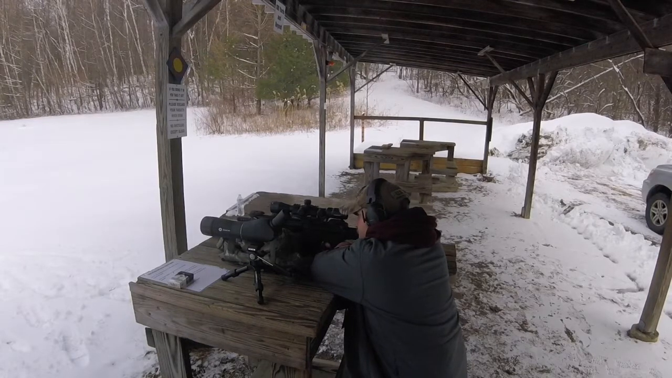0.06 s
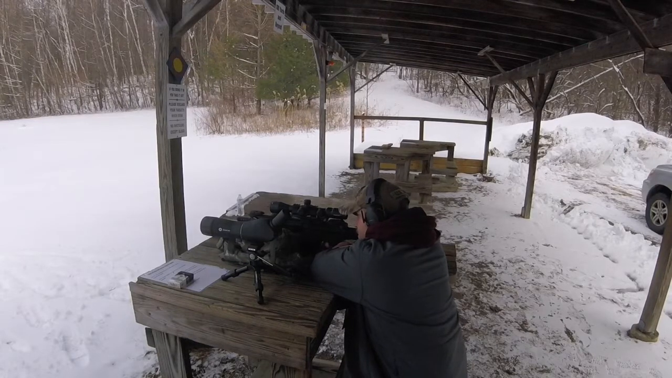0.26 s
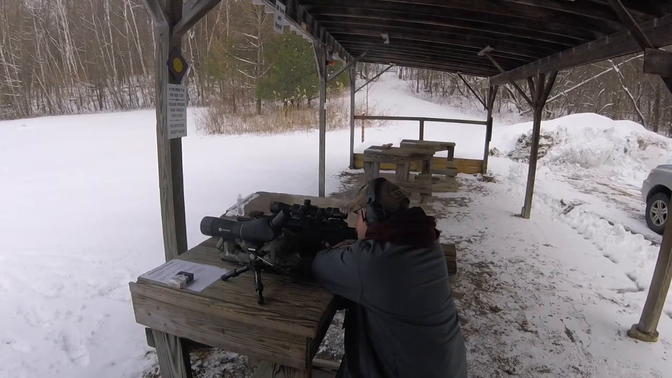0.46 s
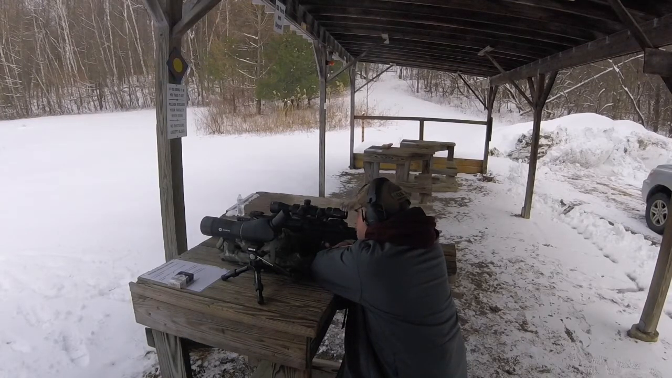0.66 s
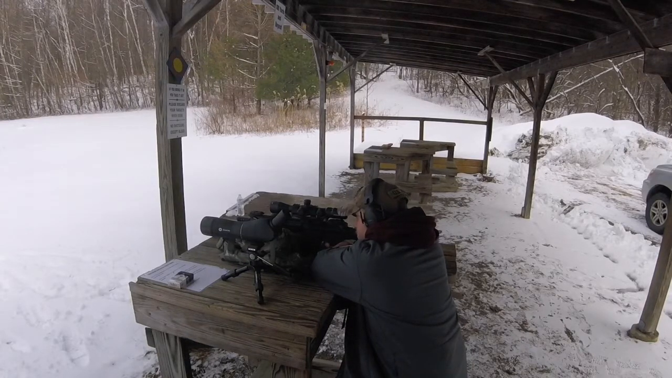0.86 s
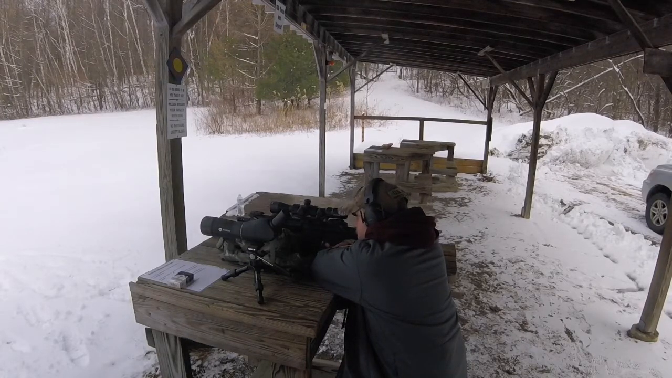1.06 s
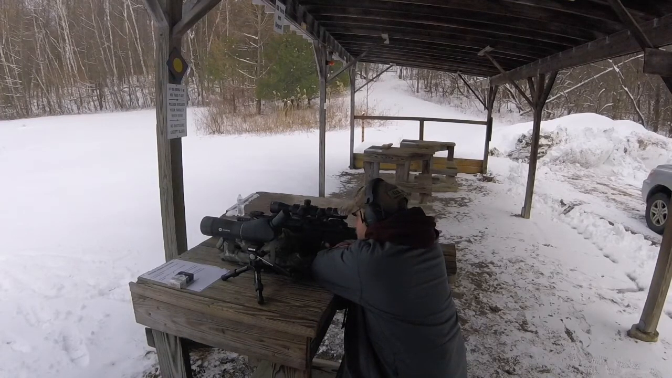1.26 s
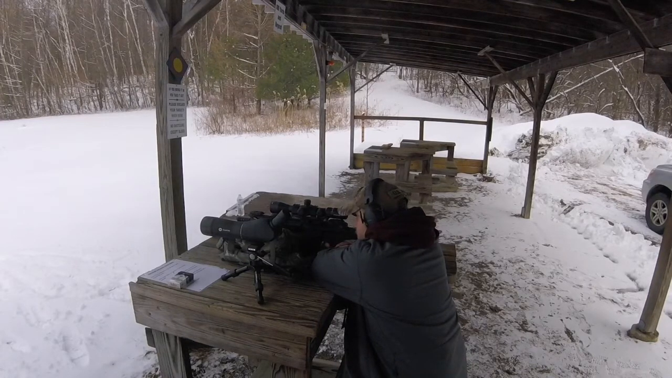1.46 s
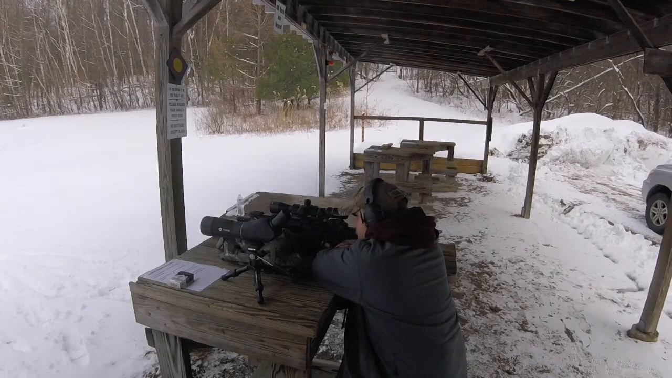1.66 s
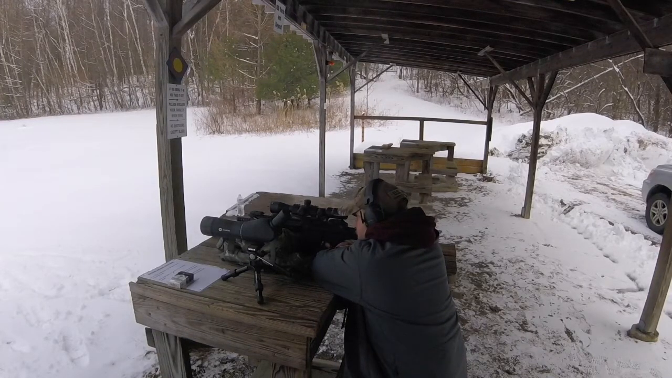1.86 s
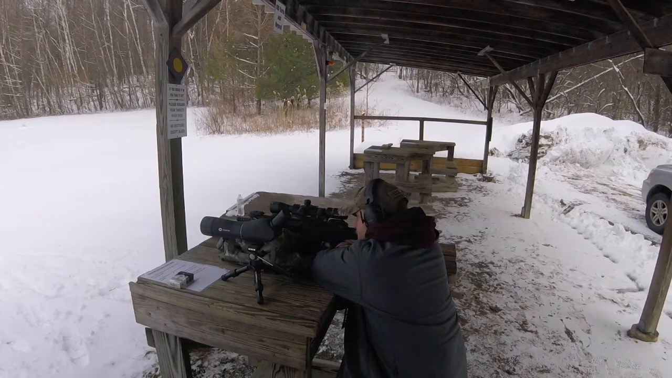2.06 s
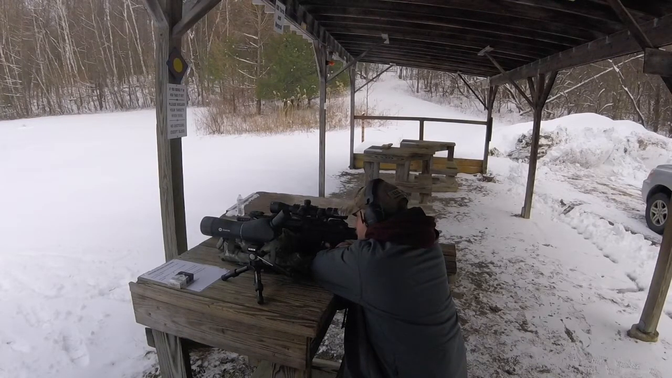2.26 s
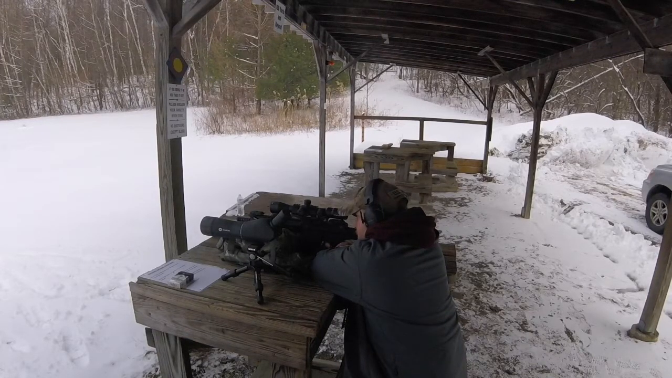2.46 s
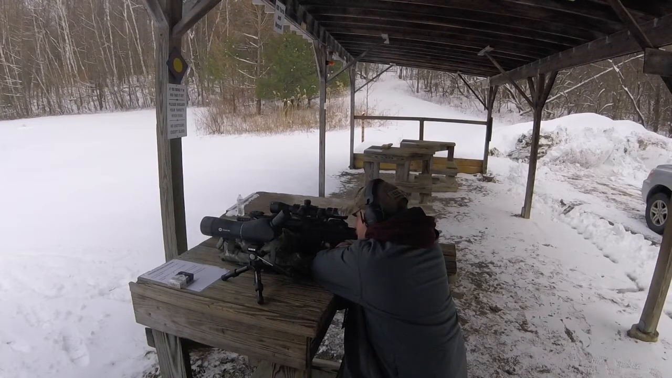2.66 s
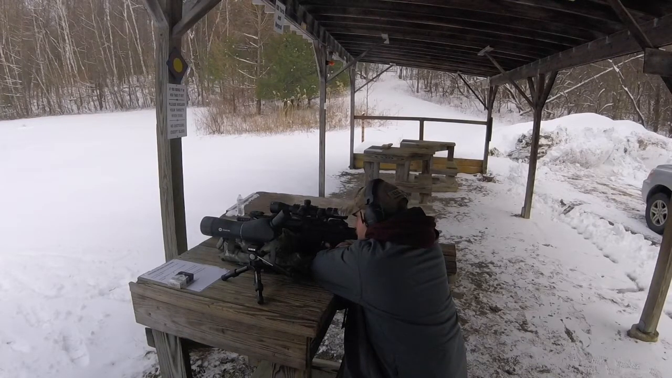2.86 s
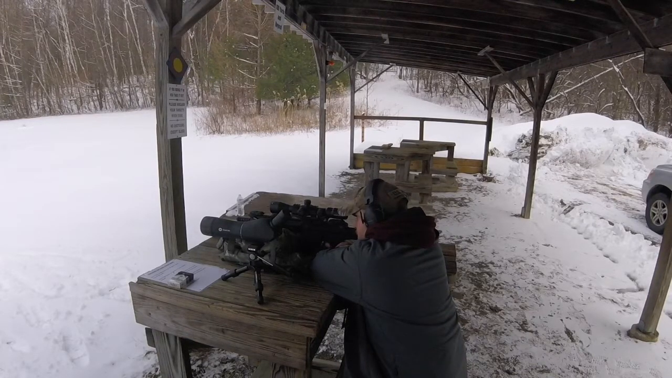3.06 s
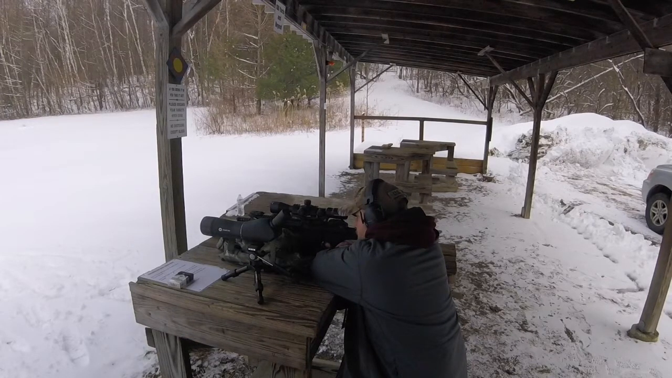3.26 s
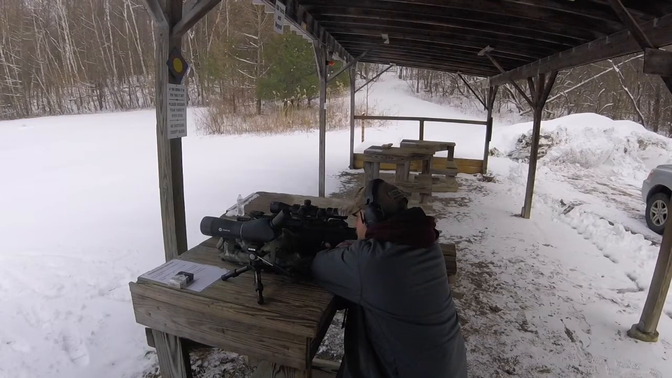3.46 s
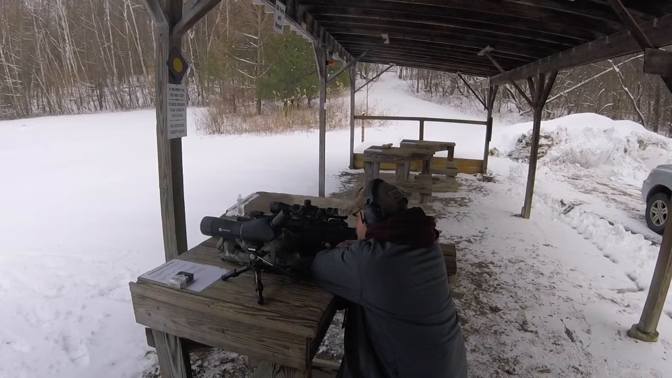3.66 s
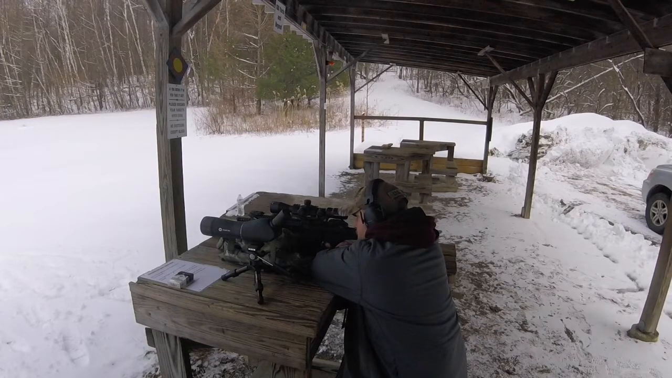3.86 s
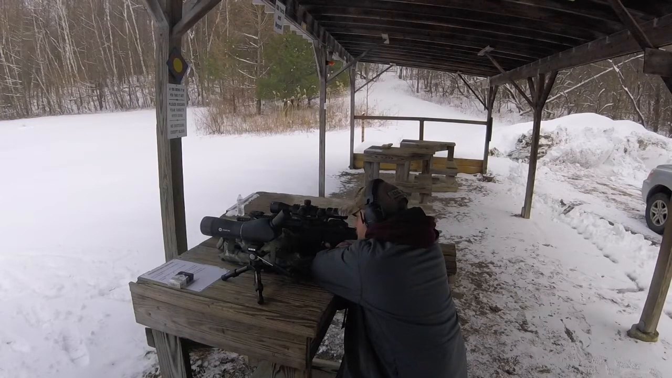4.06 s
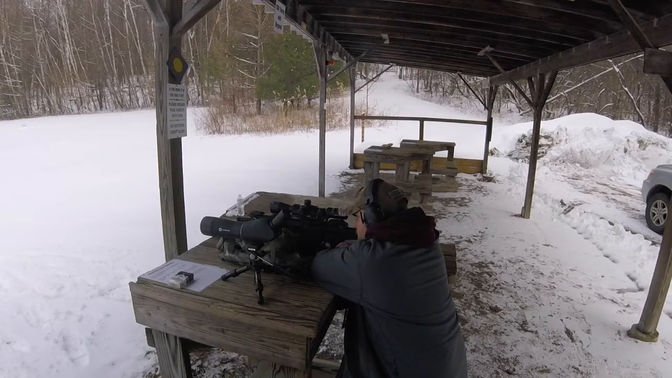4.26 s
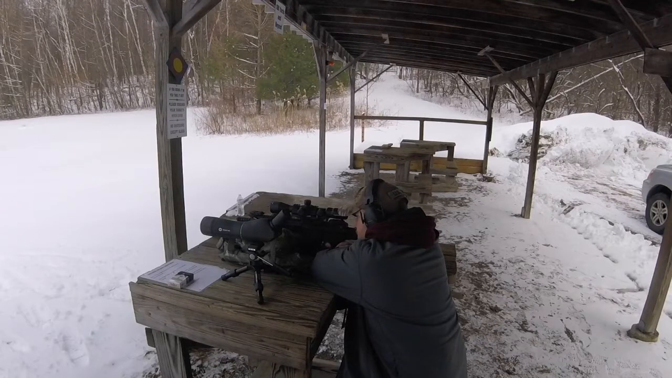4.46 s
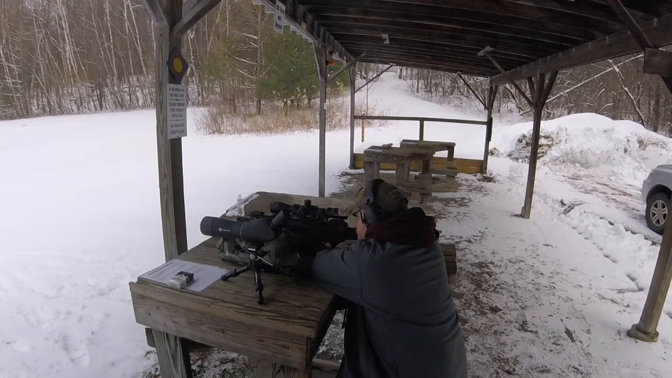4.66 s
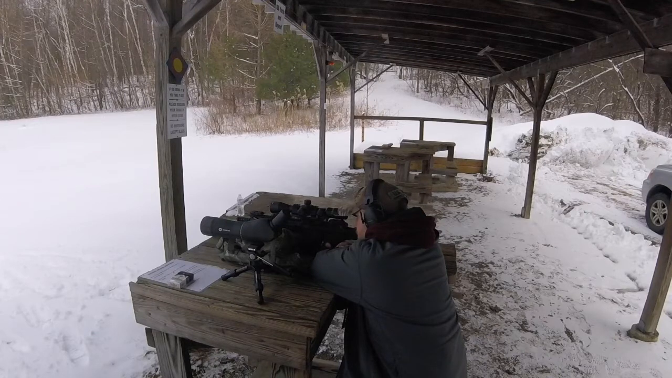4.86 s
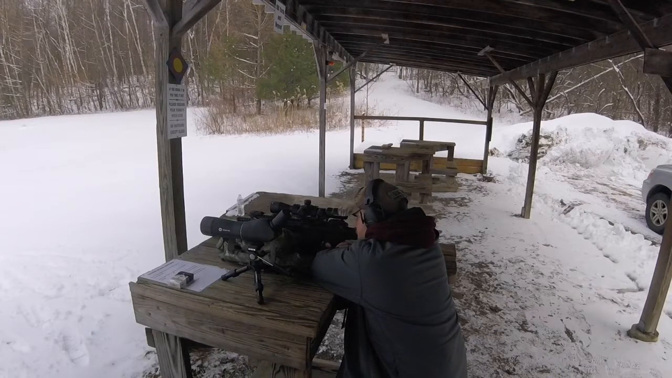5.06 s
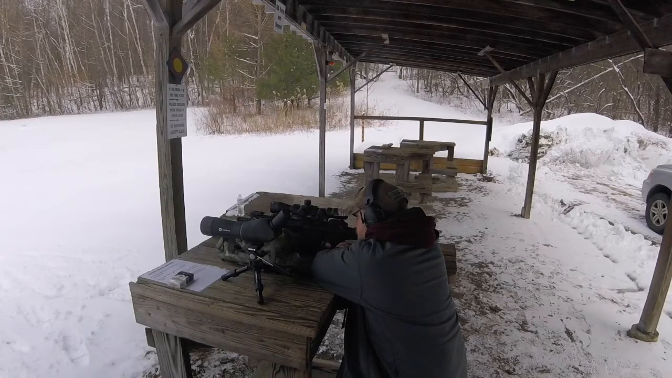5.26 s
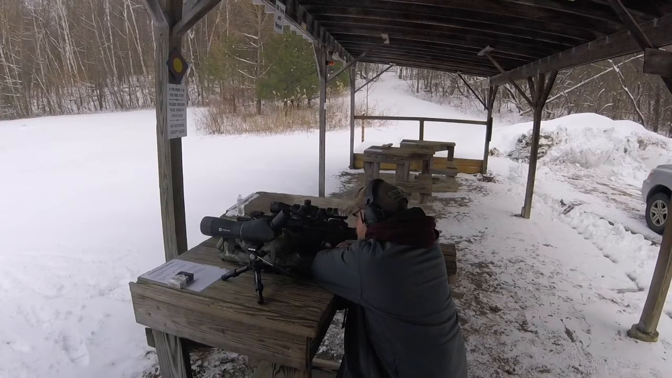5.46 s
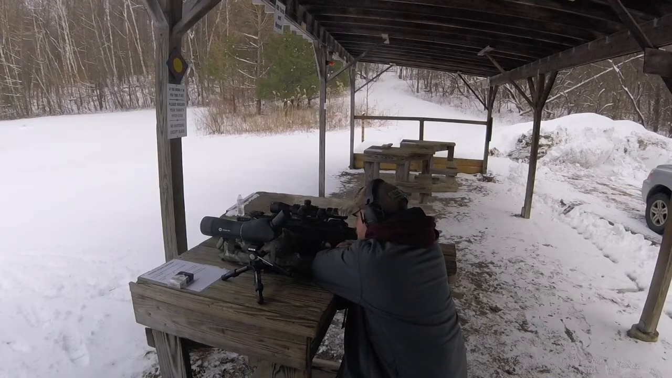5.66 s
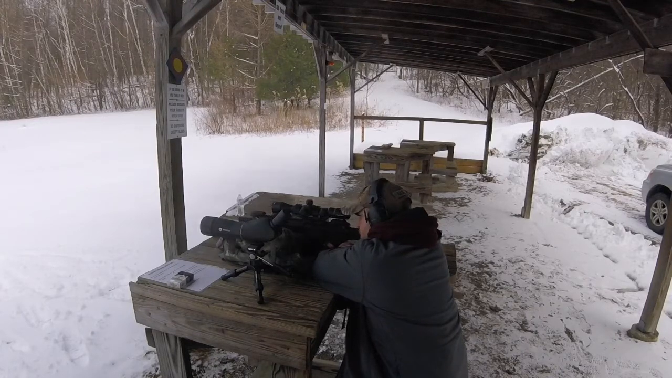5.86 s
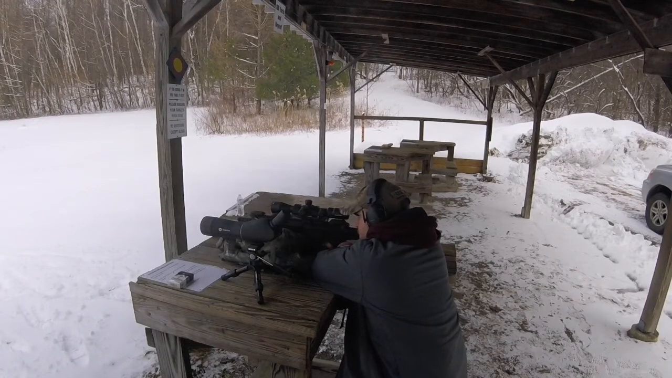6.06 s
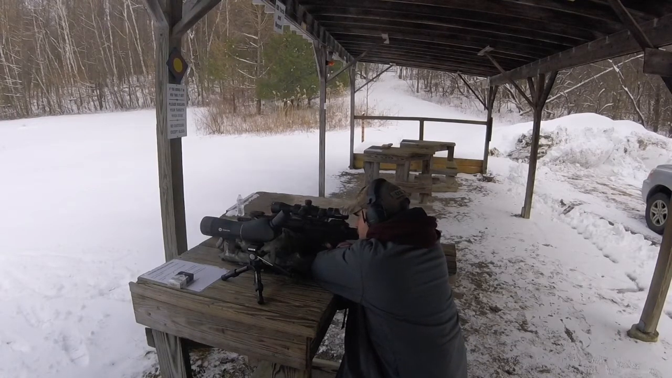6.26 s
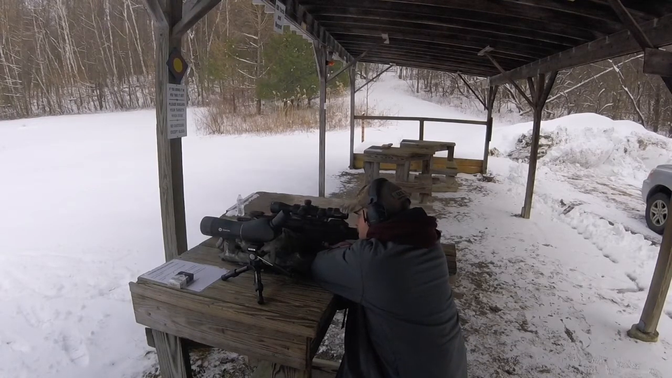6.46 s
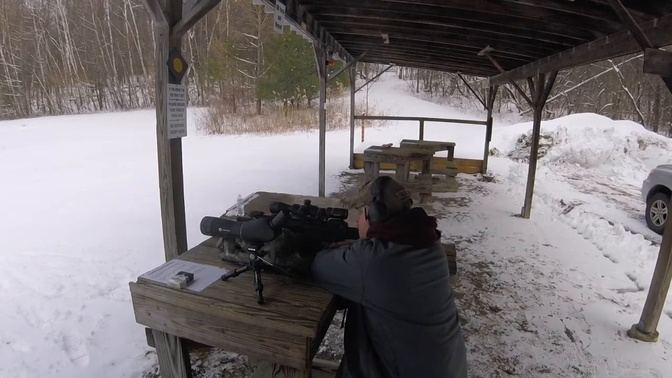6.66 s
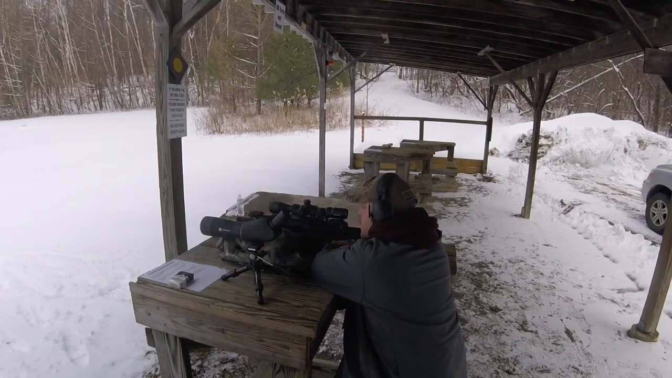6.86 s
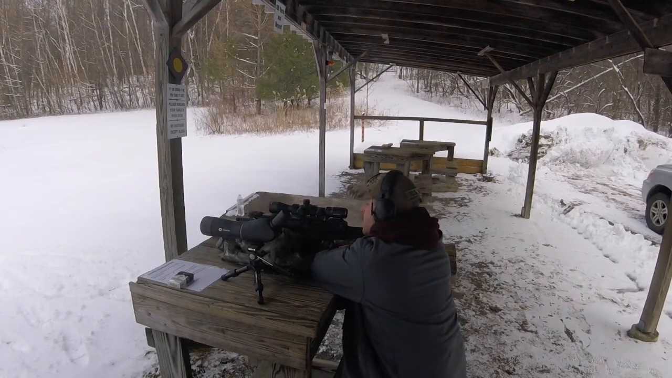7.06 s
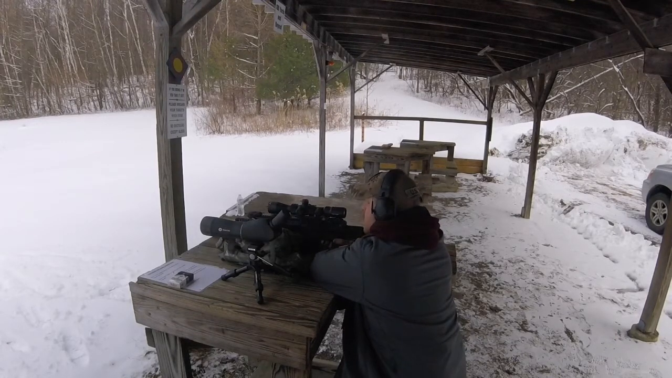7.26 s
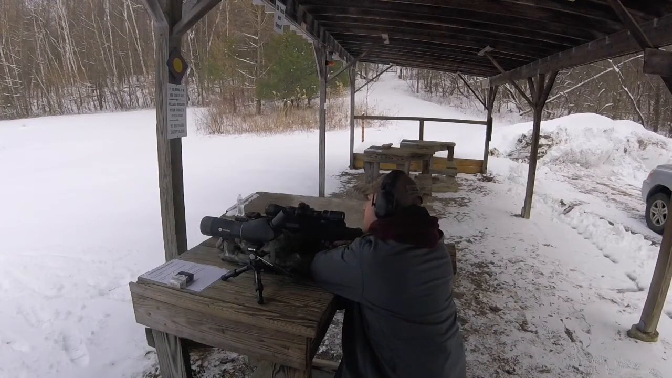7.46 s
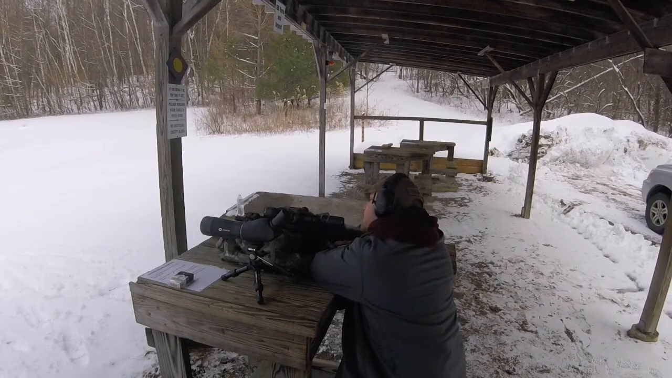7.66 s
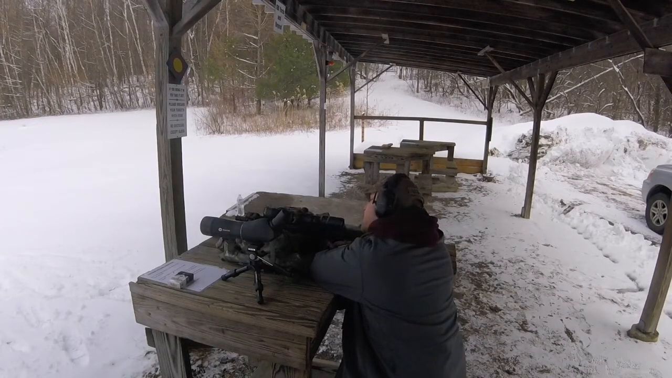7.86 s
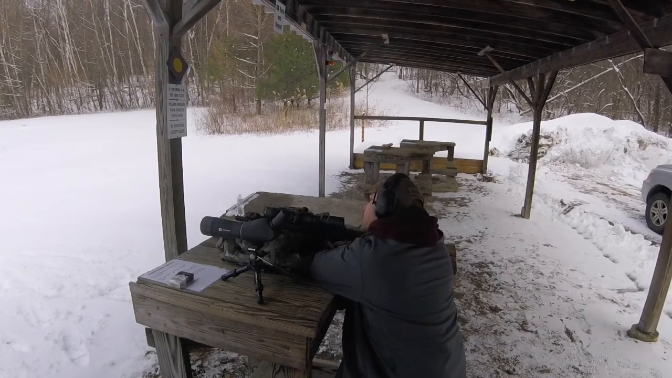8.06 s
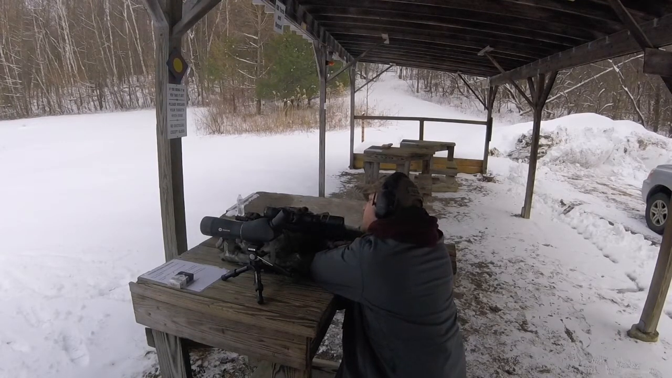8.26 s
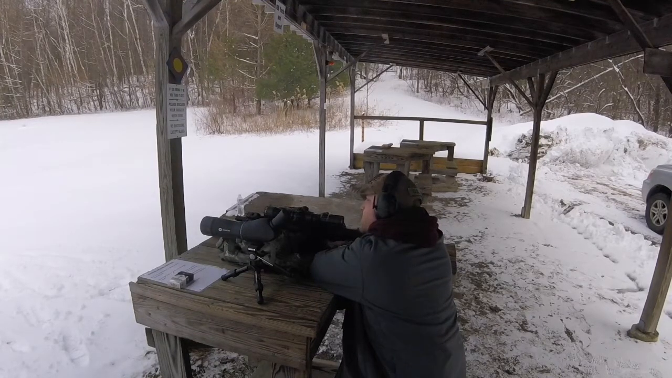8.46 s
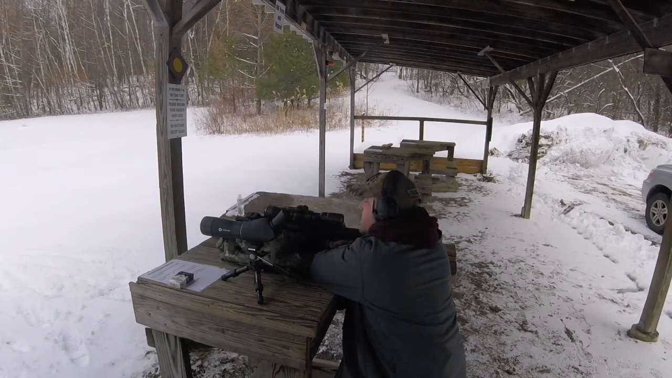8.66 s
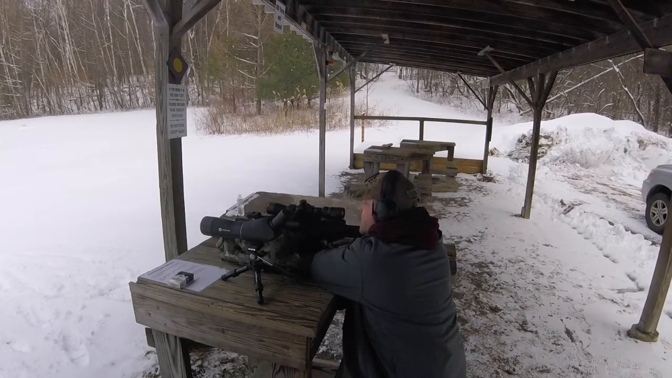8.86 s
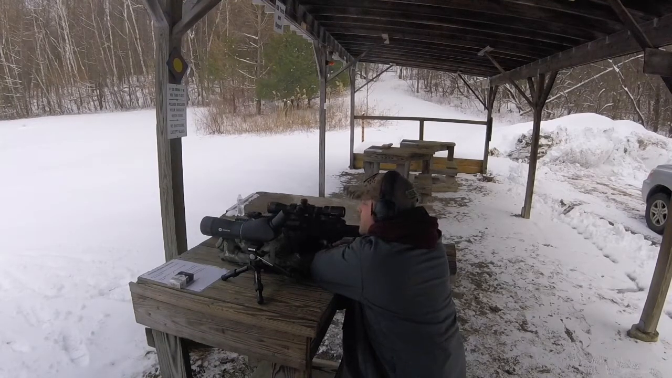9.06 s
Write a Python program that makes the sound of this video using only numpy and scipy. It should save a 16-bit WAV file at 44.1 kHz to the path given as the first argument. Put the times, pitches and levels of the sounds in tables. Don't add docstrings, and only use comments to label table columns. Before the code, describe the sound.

The echo of an earlier gunshot fades over a quiet snowy range with dripping and creaking, then one sharp, overloading pistol shot cracks and rolls away through woods.

```python
import sys
import numpy as np
from scipy import signal
from scipy.io import wavfile
from scipy.ndimage import uniform_filter1d

SR = 44100
rng = np.random.default_rng(int(sys.argv[2]) if len(sys.argv) > 2 else 0)


def gain_from_db(level_db):
    decades = np.asarray(level_db, float) / 20
    return 10 ** decades


def store_pcm(level_fs):
    pcm = np.round(np.clip(level_fs, -1, 1) * 32767).astype(np.int16)
    wavfile.write(sys.argv[1], SR, np.atleast_2d(pcm).T)


N = 402191


def evened(x):
    return x / np.sqrt(np.mean(x ** 2) + 1e-20)


def smooth_twice(x, size):
    return evened(uniform_filter1d(uniform_filter1d(x, size=size), size=size))


def read(points, hz):
    f, value = np.transpose(points)
    return np.interp(np.log(hz + 1), np.log(f + 1), value)


def add(mix, s, sound):
    at = round(s * SR)
    sound = sound[max(-at, 0):]
    part = mix[max(at, 0):][:len(sound)]
    part += sound[:len(part)]


def resonate(x, hz, width):
    return signal.lfilter(*signal.iirpeak(hz, hz / width, SR), x)


def band(x, hz, width):
    narrow = resonate(resonate(x, hz, width), hz, width)
    return evened(resonate(narrow, hz, 2 * width))


def noise(field_db, size, patchy_db):
    hop = size // 4
    hz = np.fft.rfftfreq(size, 1 / SR)
    t = np.arange(N // hop + 5) * hop / SR
    real, imaginary, patches = rng.standard_normal((len(t), len(hz), 3)).T
    patches = uniform_filter1d(patches, size=10, axis=0)
    patches = evened(uniform_filter1d(patches, size=12, axis=1))
    gain = gain_from_db(field_db(hz[:, None], t) + patchy_db * patches)
    spectra = (real + 1j * imaginary) * gain
    return signal.istft(spectra, nperseg=size, noverlap=size - hop)[1][:N] / np.sqrt(size)


SHOTS = [-.282, 5.698]
# (frequency [Hz], width [Hz], level [dB])
HOUSING = [(5550, 1160, -6.5), (6510, 500, -10.5), (2700, 830, -8.5)]
# (delay [s], signed strength, push length [s], crack level [dB])
SURFACES = [
    (0, 2.2, .0004, 12),
    (.0012, 0.5, .0004, -0.5),
    (.0049, -2.7, .0004, 11),
    (.0062, -1.5, .0007, -6),
    (0.0106, .32, .005, 8.5),
]
POSTS, POSTS_FROM_S, POSTS_APART_S = 24, .0025, .0018
POST_STRENGTH, POST_FADE_DB_PER_S, POST_PUSH_S, POST_CRACK_DB = 3.4, 447, 0.00013, 2.5
DULLING_PER_S = 28


def blast():
    t, out = np.arange(SR // 20) / SR, np.zeros(SR // 10)
    posts = []
    for k, (shift, size) in enumerate(rng.random((POSTS, 2))):
        late = (k + shift) * POSTS_APART_S
        fade_db = -POST_FADE_DB_PER_S * late
        strength = (-1) ** (k + 1) * POST_STRENGTH * gain_from_db(fade_db)
        length = POST_PUSH_S * (.5 + size) * (1 + DULLING_PER_S * late)
        posts.append((POSTS_FROM_S + late, strength, length, POST_CRACK_DB + fade_db))
    for delay, strength, length, crack_db in list(SURFACES) + posts:
        u = t / length
        push = strength * u * (1 - .2 * u) * np.exp(1 - u)
        burst = rng.standard_normal(len(t)) * np.exp(-t / 0.00026)
        crack = sum(gain_from_db(db) * band(burst, hz, width) for hz, width, db in HOUSING)
        add(out, max(delay, 0), push + gain_from_db(crack_db - 23.5) * crack)
    return out


# (frequency [Hz], level [dB per Hz])
SHELTER_TONE = [(30, -25), (60, -35), (170, 7.5), (260, -6), (520, 5.5), (750, -6.5), (1080, -1),
                (1600, -9), (2700, -11), (4300, -17.5), (5400, -12), (6600, -12.5), (9800, -26),
                (14000, -84)]
# (frequency [Hz], level [dB], time to fall 60 dB [s])
BEAMS = [(105.4, -9.5, 0.94), (115, -13, 0.71)]
SHELTER_DB, SHELTER_START_DB, SHELTER_FILL_S = -11.5, -14, .022
SHELTER_FALL_DB_PER_S, SHELTER_LATE_DB, SHELTER_LATE_DB_PER_S = 323, -11.5, 80.5


def shelter():
    t, out = np.arange(2 * SR) / SR, np.zeros(N)

    def wash_db(hz, s):
        return read(SHELTER_TONE, hz) - 70 * s * (hz / 5000) ** 0.99

    wash = noise(wash_db, size=512, patchy_db=2.0)
    wash = wash[:len(t)] / np.std(wash[:SR // 4])
    filling = SHELTER_START_DB + (SHELTER_DB - SHELTER_START_DB) * (t / SHELTER_FILL_S) ** .5
    emptying = SHELTER_DB - SHELTER_FALL_DB_PER_S * (t - SHELTER_FILL_S)
    lingering = SHELTER_LATE_DB - SHELTER_LATE_DB_PER_S * t
    level_db = np.minimum(filling, np.maximum(emptying, lingering))
    hum = sum(gain_from_db(db - 60 * t / t60) * np.sin(2 * np.pi * hz * t) for hz, db, t60 in BEAMS)
    ducked = 1 - np.exp(-t / 0.15)
    for s in SHOTS:
        add(out, s, gain_from_db(level_db) * wash + hum * ducked)
    return out


# (time after the shot [s], level [dB])
WOODS = [(.1, -31), (.34, -23), (.95, -26.5), (1.3, -25), (1.8, -29), (2.35, -35), (3.15, -37),
         (4.2, -50.5), (4.9, -61)]
# (frequency [Hz], level [dB per Hz])
WOODS_TONE = [(60, -16), (130, -10), (220, -24.5), (290, -18), (370, -0.5), (620, 2.5), (870, -3.5),
              (2300, -8.5), (3300, -16.5), (4300, -23.5), (5500, -13), (6300, -27), (8900, -38.5),
              (12000, -72)]
# (frequency [Hz], loss against the low middle [dB per s])
PATH_LOSS = [(130, 51), (220, 8), (290, -4.5), (500, -0.26), (1000, 2.5), (2000, 8.5), (3500, 21.5),
             (5500, 34), (9000, 57)]
STANDS_DB = 0.72


def woods():
    t, out = np.arange(N) / SR, np.zeros(N)
    power = np.mean(gain_from_db(2 * read(WOODS_TONE, np.linspace(280, 845, 200))))
    unit_db = -10 * np.log10(power * (845 - 280) / SR)
    times, levels_db = np.transpose(WOODS)
    for s in SHOTS:
        def roll_db(hz, at):
            return read(WOODS_TONE, hz) - read(PATH_LOSS, hz) * np.maximum(at - s - .45, 0)

        roll = noise(roll_db, size=512, patchy_db=0.5)
        lumps = evened(uniform_filter1d(rng.exponential(1, N) ** 3, size=250) ** .5)
        stands = smooth_twice(rng.standard_normal(N), 900)
        arrive = np.clip((t - s - .08) / 0.18, 0, 1)
        fade_db = 20 * np.maximum(t - s - times[-1], 0)
        level_db = np.interp(t - s, times, levels_db) + STANDS_DB * stands + unit_db - 0.5 - fade_db
        out += roll * (0.61 + 0.46 * lumps) * arrive * gain_from_db(level_db)
    return out


def tick(burst, ragged, hz, low_db, high_db, t60):
    t = np.arange(len(burst)) / SR
    head = 0.5 * np.exp(-(t / 0.0014) ** 2)
    rag = evened(uniform_filter1d(ragged ** 4, size=90) ** .5)
    tail = 0.28 * rag * gain_from_db(-60 * t / t60)
    shape = (head + tail) * np.minimum(t / 0.00085, 1)
    parts = band(burst, hz, 1430)
    parts = parts + gain_from_db(low_db + 4.0) * band(burst, 2760, 2700)
    parts = parts + gain_from_db(high_db + 8.0) * band(burst, 7400, 2400)
    return signal.lfilter(*signal.butter(4, 9000, fs=SR), shape * parts)


def single_tick(s, db, *colour):
    out = np.zeros(N)
    burst, ragged = rng.standard_normal((2, SR // 8))
    add(out, s, gain_from_db(db - 5.0) * tick(burst, ragged, *colour))
    return out


# (time after the shot [s], peak level [dB], centre frequency [Hz], low part [dB], high part [dB])
SLAPS = [
    (0.1795, -12.5, 5300, -13, -23),
    (.448, -10, 5300, -2, -36),
]


def slaps():
    return sum(single_tick(s + late, *rest, .035) for s in SHOTS for late, *rest in SLAPS)


# (time [s], peak level [dB], centre frequency [Hz])
DRIPS = [(0.0387, -17, 5400), (1.6378, -30.5, 5470), (1.674, -25, 5270), (1.728, -36, 5800),
         (2.1191, -30, 6160), (2.18, -38, 5680), (2.2345, -20.5, 5750), (2.3311, -30, 5270),
         (2.3894, -33, 5490), (2.411, -28.5, 5600), (2.5086, -24.5, 6060), (2.707, -28, 5360),
         (2.8639, -25.5, 6330), (3.179, -19, 5900), (3.908, -26.5, 6240), (4.591, -33, 6340),
         (4.6359, -20.5, 5600), (4.788, -20, 5740), (5.582, -25, 5600), (5.6022, -17.5, 6000),
         (6.0476, -9, 5800), (7.5981, -24, 6200), (7.887, -24.5, 6340), (8.399, -20, 6340),
         (8.771, -25, 5900)]
DRIP_LOW_DB, DRIP_HIGH_DB, DRIP_T60_S = -21.5, -6.5, 0.098
HEAVY_DULL = 0.73


def drips():
    out = np.zeros(N)
    for s, db, hz in DRIPS:
        high_db = DRIP_HIGH_DB - HEAVY_DULL * (db + 37)
        out += single_tick(s, db, hz, DRIP_LOW_DB, high_db, DRIP_T60_S)
    return out


# (time [s], peak level [dB], time to fall 60 dB [s], low part [dB])
CREAKS = [(1.173, -33, 0.092, -10), (2.369, -29, .13, -12), (2.6314, -34, .09, -12),
          (2.7503, -25, 0.15, -10), (2.7694, -33, .11, -1), (3.049, -36, .1, -14), (3.4095, -23, .08, -11),
          (3.4994, -34, .1, -8), (4.229, -31, .1, -12), (4.319, -29, .1, -13), (4.359, -24.5, 0.11, -12),
          (4.51, -25.5, .08, -13), (4.7574, -30, .11, -10), (4.8928, -23.5, 0.17, -7),
          (5.348, -29, .09, -11), (5.5478, -31, .1, -12), (6.823, -31.5, 0.11, -8), (7.011, -30, .12, -10),
          (7.423, -34, .2, -10), (7.7124, -34.5, .1, -6), (7.8517, -28, .13, -10), (8.106, -35, .1, -1),
          (8.342, -27, .07, -14), (8.68, -38, .1, 1), (8.71, -15.5, 0.11, -6), (8.8655, -24.5, 0.16, -6.5),
          (8.996, -22, 0.075, -8), (9.056, -31, .1, -10)]
CREAK_HZ, CREAK_HIGH_DB = 5600, -10.5


def creaks():
    return sum(single_tick(s, db, CREAK_HZ, low_db, CREAK_HIGH_DB, t60) for s, db, t60, low_db in CREAKS)


# (time [s], peak level [dB], time to fall 60 dB [s])
CASES = [
    (0.3935, -46.5, 0.47),
    (0.6714, -44, 0.2),
    (6.3245, -36, 0.12),
]
# (frequency [Hz], level [dB])
BRASS = [(8400, -0.5), (8550, -10), (9700, -17), (12400, -60)]


def cases():
    t, out = np.arange(SR // 3) / SR, np.zeros(N)
    for s, db, t60 in CASES:
        ring = np.zeros(len(t))
        for hz, part_db in BRASS:
            fall_db = 60 * t / t60 * (hz / 8400) ** 3
            ring += gain_from_db(part_db - fall_db) * np.sin(2 * np.pi * hz * t)
        rattle = 1.05 * band(rng.standard_normal(len(t)), 8000, 3600) * np.exp(-t / 0.014)
        add(out, s, gain_from_db(db - 7.0) * (ring + rattle) * np.minimum(t / 0.0011, 1))
    return out


# (time [s], peak level [dB], frequency [Hz])
KNOCKS = [
    (0.742, -20, 560),
    (0.92, -24, 606),
    (1.914, -27, 510),
    (2.892, -32, 574),
]


def knocks():
    t, out = np.arange(SR // 30) / SR, np.zeros(N)
    for s, db, hz in KNOCKS:
        cycles = hz * t
        add(out, s, gain_from_db(db + 4.5) * np.sin(2 * np.pi * cycles) * cycles * np.exp(1 - cycles))
    return out


# (time [s], peak level [dB], time to fall 60 dB [s])
BUMPS = [
    (8.105, -37, 0.1),
    (8.688, -30, 0.1),
    (8.7112, -28, 0.1),
    (8.7297, -37, 0.2),
    (8.875, -36, 0.076),
    (8.9954, -36, 0.17),
]


def bumps():
    t, out = np.arange(SR // 8) / SR, np.zeros(N)
    for s, db, t60 in BUMPS:
        burst = rng.standard_normal(len(t))
        add(out, s, gain_from_db(db - 5.5 - 60 * t / t60) * band(burst, 1420, 990))
    return out


# (start time [s], end time [s], level [dB])
RUSTLE = [(2.33, 2.448, -55), (4.567, 4.687, -53), (5.288, 5.39, -52), (5.539, 5.656, -48.5),
          (7.424, 7.544, -52), (8.304, 8.383, -53), (8.708, 8.803, -45)]


def rustle():
    out = np.zeros(N)
    for start, end, db in RUSTLE:
        burst, clumps = rng.standard_normal((2, SR // 2))
        snaps = band(burst, 5800, 2700) * evened(uniform_filter1d(clumps ** 6, size=150) ** .5)
        length = round((end - start) * SR)
        add(out, start, gain_from_db(db) * snaps[:length] * signal.windows.tukey(length, .5))
    return out


# (start time [s], frequency [Hz], sag [Hz per s], level [dB], swell [dB per s])
DRONE = (2.5, 297, 21, -55.5, 2)


def drone():
    t = np.arange(N) / SR
    start, hz, sag, db, nearing = DRONE
    waver = smooth_twice(rng.standard_normal(N), 3000)
    turns = np.cumsum(hz - sag * (t - start) + .4 * waver) / SR
    inside = np.clip((t - start) / .5, 0, 1) * (t < SHOTS[1])
    swell_db = 1.2 * np.roll(waver, 9000)
    level = np.sqrt(2) * gain_from_db(db + nearing * (t - start) + swell_db)
    return level * inside * np.sin(2 * np.pi * turns)


GAIN_REST_DB, GAIN_DUCK_DB, GAIN_HOLD_S, GAIN_RECOVER_S = -60.5, 12.5, 0.52, 1.51


def background_db(t):
    since = t - np.where(t < SHOTS[1], *SHOTS)
    return GAIN_REST_DB - GAIN_DUCK_DB * np.exp(-np.maximum(since - GAIN_HOLD_S, 0) / GAIN_RECOVER_S)


def patter():
    out = np.zeros(N)
    for s, size in zip(rng.uniform(0, N / SR, 70), rng.exponential(1, 70)):
        burst, ragged = rng.standard_normal((2, SR // 16))
        level = gain_from_db(background_db(s) + 16 + 0.77 * size)
        add(out, s, level * tick(burst, ragged, 4800, -12, -9, 0.031))
    return out


# (frequency [Hz], level [dB per Hz])
AIR = [(12, -30), (20, 3), (65, 1), (174, -5), (290, -8.5), (1900, -18), (3400, -24), (4350, -29.5),
       (5000, -25.5), (7300, -19.5), (9500, -24), (10600, -30.5), (12300, -26), (14500, -36.5)]
# (frequency [Hz], width [Hz], level [dB])
RIDGE = (6566, 380, 11.8)
AIR_OVER_GAIN_DB = 18.5


def air():
    centre, width, db = RIDGE

    def hiss_db(hz, s):
        return read(AIR, hz) + db / (1 + (2 * (hz - centre) / width) ** 2)

    hiss = noise(hiss_db, size=2048, patchy_db=2.0)
    return evened(hiss) * gain_from_db(background_db(np.arange(N) / SR) + AIR_OVER_GAIN_DB)


def scene():
    mix = shelter() + woods() + slaps() + drips() + creaks() + cases()
    mix += knocks() + bumps() + rustle() + drone() + patter() + air()
    add(mix, SHOTS[1], blast())
    return mix[None]


# (frequency [Hz], threshold [dB per bin])
QUIET = [(3000, -110), (4350, -88), (5500, -104), (7500, -100), (9300, -94), (10600, -94.5), (11800, -93),
         (12600, -89.5), (13100, -89), (14000, -88), (15000, -70)]
BAND_QUIET_DB, LINE_QUIET_DB = -4, 2


def gated(x):
    hz, _, z = signal.stft(x, SR, nperseg=2048, noverlap=1024)
    over_db = 10 * np.log10(abs(z) ** 2 + 1e-20) - read(QUIET, hz)[:, None]
    band_db = 10 * np.log10(uniform_filter1d(gain_from_db(2 * over_db), size=8, axis=0) + 1e-20)
    keep = (band_db > BAND_QUIET_DB) & (over_db > LINE_QUIET_DB)
    return signal.istft(z * keep, SR, nperseg=2048, noverlap=1024)[1][None, :N]


def low_pass(x):
    return signal.sosfilt(signal.butter(12, 14140, fs=SR, output="sos"), x)


# (start time [s], end time [s])
CUT = (5.6568, 5.6975)


def record(dry):
    t = np.arange(N) / SR
    cut = dry * ((t < CUT[0]) | (t > CUT[1]))
    cut = signal.lfilter(*signal.butter(1, 15, "high", fs=SR), cut)
    finished = gated(np.clip(cut[0], -1, 1))
    return low_pass(finished)


dry = scene()
out = record(dry)
store_pcm(out)
```